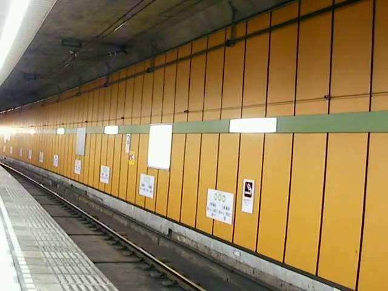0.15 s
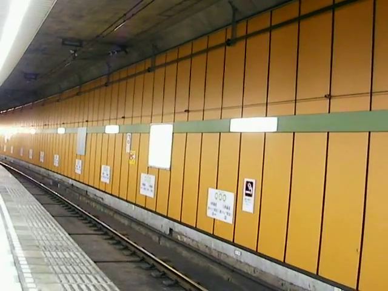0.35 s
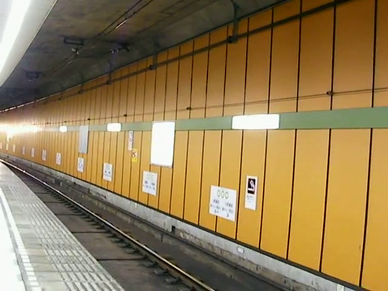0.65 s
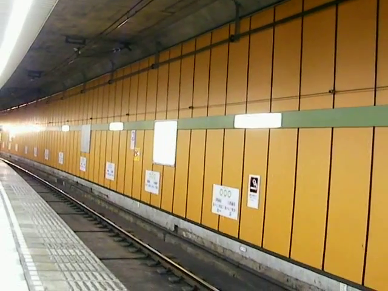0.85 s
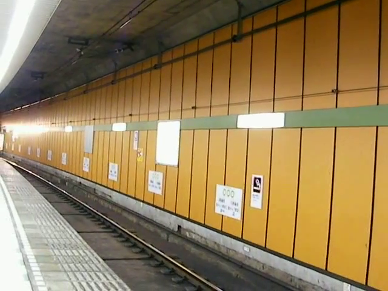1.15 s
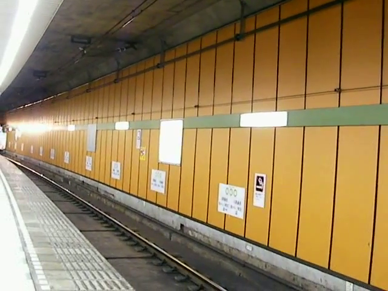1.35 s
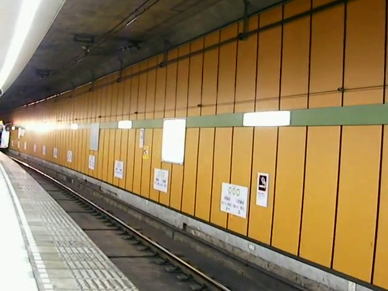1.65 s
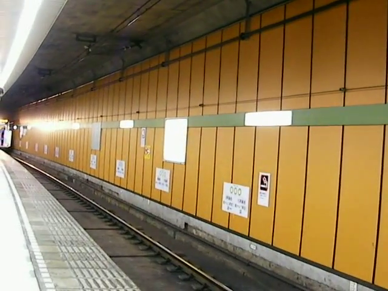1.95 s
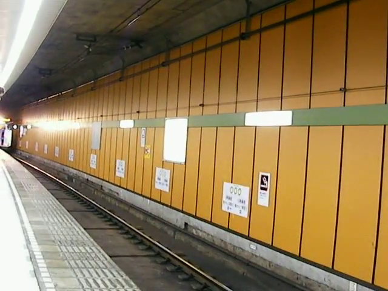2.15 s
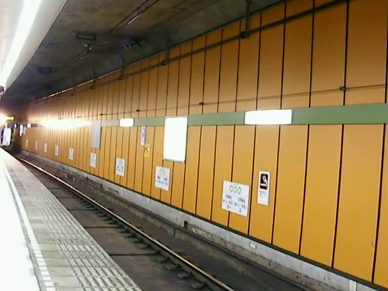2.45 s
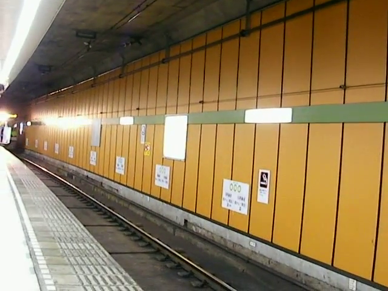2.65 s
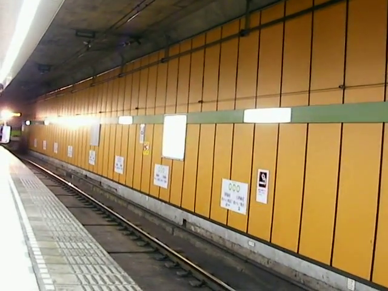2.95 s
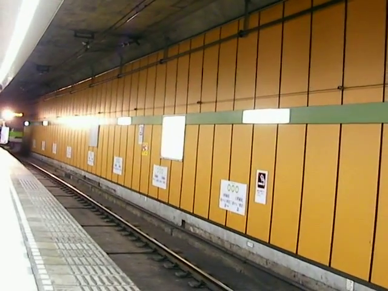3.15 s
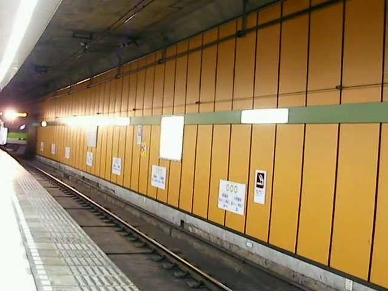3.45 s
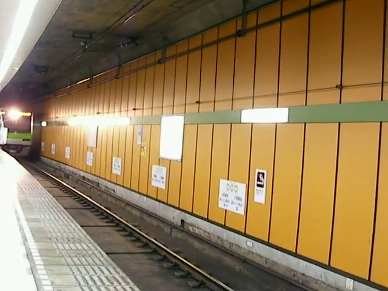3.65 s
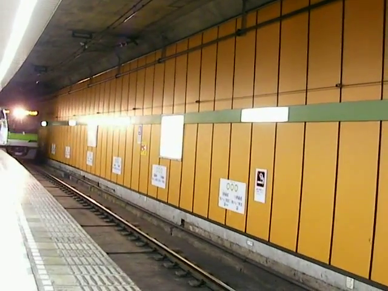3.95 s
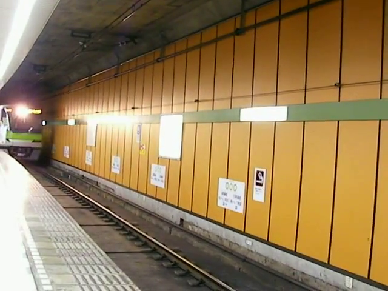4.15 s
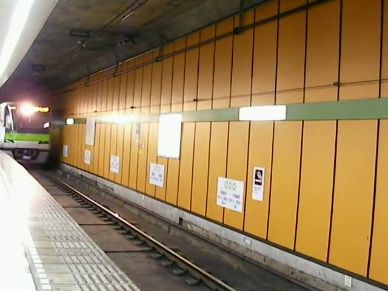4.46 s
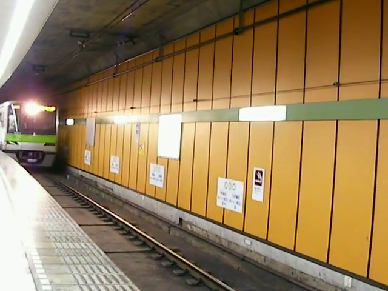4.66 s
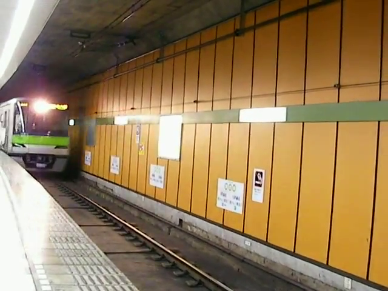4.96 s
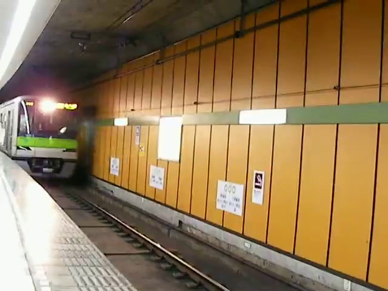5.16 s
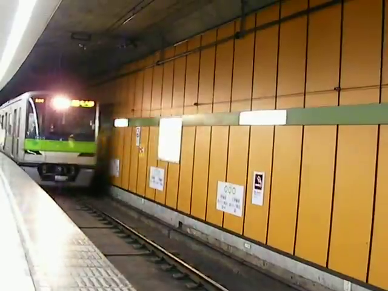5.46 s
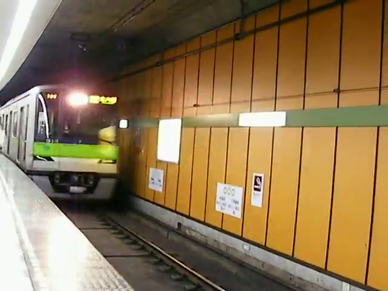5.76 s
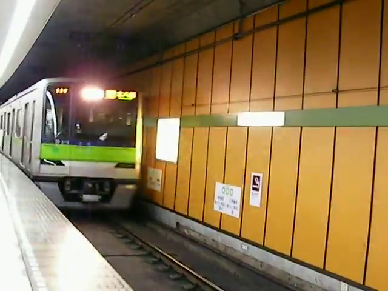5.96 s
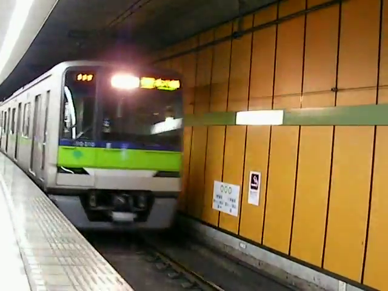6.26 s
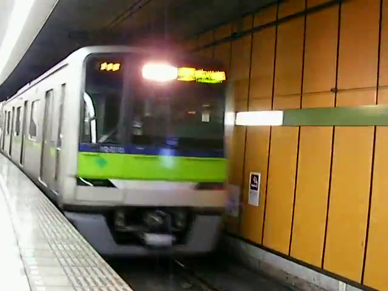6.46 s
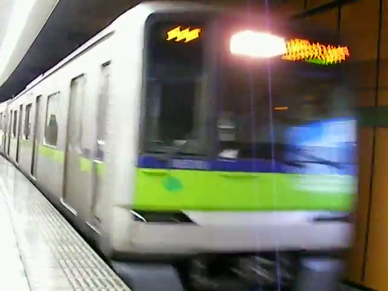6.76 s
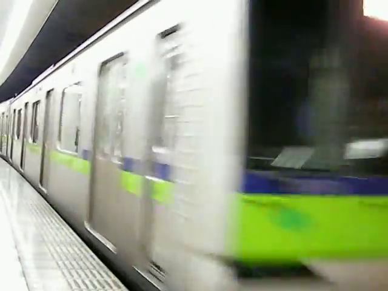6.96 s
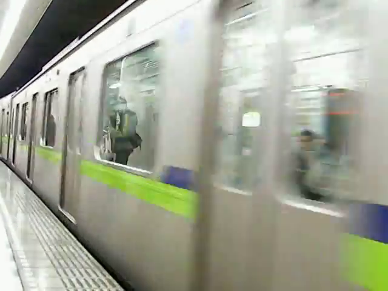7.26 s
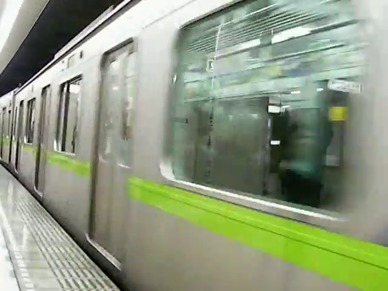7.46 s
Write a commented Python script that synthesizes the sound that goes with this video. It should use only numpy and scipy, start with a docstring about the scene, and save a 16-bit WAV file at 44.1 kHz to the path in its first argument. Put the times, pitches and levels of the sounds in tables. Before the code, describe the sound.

Roaring, booming rumble of an approaching subway train, with irregular wheel clacks, thin metallic ringing and a growing steel hiss.

```python
"""A subway train runs out of its tunnel along a tiled platform, heard by two closely spaced microphones.
From the start the track rumbles and roars, flanges grind, narrow tones swell and fade, sliding steel
hisses and surges at each slip, and the tunnel booms and throbs. The rails ping; from 0.6 s wheels knock
over joints and roar over rough patches. From 1.5 s they ring in the curve. After 5 s the hiss grows as
the nearest wheels sweep from left to right, and the cab passes at about 7 s."""
import sys
import numpy as np
from scipy import signal
from scipy.fft import rfft, irfft, next_fast_len
from scipy.io import wavfile
from scipy.ndimage import uniform_filter1d, map_coordinates

SR = 44100
rng = np.random.default_rng(int(sys.argv[2]) if len(sys.argv) > 2 else 0)


def dump(signal):
    """Clip the signal to [-1, 1] and save it as 16-bit WAV at the path in sys.argv[1]."""
    limited = np.clip(np.atleast_2d(signal).T, -1, 1)
    pcm = np.round(limited * 32767).astype(np.int16)
    wavfile.write(sys.argv[1], SR, pcm)


N = 335821
TIME = np.arange(N) / SR
FFT_SIZE = next_fast_len(N)
HZ = np.maximum(np.arange(FFT_SIZE // 2 + 1) * SR / FFT_SIZE, 1)


def from_db(db):
    """Decibels to gain."""
    return 10 ** (np.asarray(db) / 20)


def in_time(rows):
    """Each column of a time curve at every sample."""
    t_s, *columns = np.transpose(rows)
    return [np.interp(TIME, t_s, column) for column in columns]


def over_hz(points):
    """Table interpolated over log frequency."""
    hz, value = np.transpose(points)
    return np.interp(np.log(HZ), np.log(hz), value)


def resonances(modes):
    """Gain over frequency of independently driven, steep-sided resonances."""
    gains = (from_db(db) / (1 + 2 * ((HZ - hz) / width_hz) ** 2) for hz, width_hz, db in modes)
    return np.sqrt(sum(gain ** 2 for gain in gains))


def mono_noise(colour):
    """Coloured noise, rms 1."""
    noise = irfft(rfft(rng.standard_normal(FFT_SIZE)) * colour, FFT_SIZE)[:N]
    return noise / np.sqrt(np.mean(noise ** 2) + 1e-20)


def drift(rate_hz):
    """Random wander, rms 1, mostly below rate_hz."""
    return mono_noise(1 / (1 + (HZ / rate_hz) ** 2))


def steady(pair, span_s):
    """Even out swells slower than span_s."""
    power = uniform_filter1d(pair.mean(axis=0) ** 2, int(span_s * SR))
    return pair / np.sqrt(power + 1e-9)


def swell(start_s, hold_s, attack_s, release_s):
    """Gain: linear rise, hold, exponential decay."""
    age_s = TIME - start_s
    fall = np.clip((age_s - attack_s - hold_s) / release_s, 0, 20)
    return np.clip(age_s / attack_s, 0, 1) * np.exp(-fall)


def with_bursts(base_db, bursts, attack_s, release_s):
    """Gain of a base level plus bursts (t/s, hold/s, level/dB), summed in power."""
    power = sum((from_db(db) * swell(t_s, hold_s, attack_s, release_s)) ** 2
                for t_s, hold_s, db in bursts)
    return np.sqrt(from_db(base_db) ** 2 + power)


def pan(left_minus_right_db):
    """Left and right gains."""
    return from_db(left_minus_right_db * np.array([[.5], [-.5]]))


# Likeness of the microphones: f/Hz, coherence (-1 opposed, 1 alike)
MIC_COHERENCE = [(30, .25), (70, .78), (150, .78), (250, .89), (480, .8), (1100, .76), (1700, .75),
                 (2600, .6), (4000, .36), (5000, .25), (6200, -.25), (7800, -.5), (9000, -.25),
                 (10000, -.38), (11200, .05), (13500, .2)]
# Balance: f/Hz, left minus right/dB
MIC_BALANCE = [(35, -1), (75, -3), (125, -2), (200, -4), (260, -3), (310, -6), (360, -2.5), (430, -4),
               (1000, -5), (1880, -2), (2700, 0), (3500, 4), (5040, 2.5), (7000, 0.5), (10000, -1.5),
               (13500, 0.5)]
# Lead of the left microphone: f/Hz, phase/rad
MIC_PHASE = [(60, -.6), (110, -.25), (300, -.1), (600, .1), (1000, .35), (2000, .75), (2800, .95),
             (4000, .3), (5000, .6), (6200, -.5), (9000, -.3), (10500, -.3), (11500, 1.0), (13500, .8)]
def air_noise(colour, coherence=None):
    """Coloured noise from the tunnel mouth at both microphones; their mean has rms 1."""
    alike = over_hz(MIC_COHERENCE) if coherence is None else coherence
    mid, side = rng.standard_normal((2, len(HZ))) + 1j * rng.standard_normal((2, len(HZ)))
    mid, side = np.sqrt(1 + alike) * mid, np.sqrt(1 - alike) * side
    left = (mid + side) * np.exp(1j * over_hz(MIC_PHASE))
    spectra = np.array([left, mid - side]) * pan(over_hz(MIC_BALANCE))
    pair = irfft(colour * spectra, FFT_SIZE)[:, :N]
    return pair / np.std(pair.mean(axis=0))


# Track bed spectrum: f/Hz, level/dB
BED_SPECTRUM = [(15, -47), (30, -38), (40, -35), (52, -3.5), (75, 6), (120, 4), (160, -0.5), (260, 2),
                (400, -50)]
def bed_rumble(level_db=-39.5, sway_db=1.0):
    """The track bed rumbles under a train rolling at even speed."""
    rumble = steady(air_noise(from_db(over_hz(BED_SPECTRUM))), span_s=0.25)
    return rumble * from_db(level_db + sway_db * drift(rate_hz=10))


# Roar spectrum: f/Hz, level/dB
ROAR_SPECTRUM = [(200, -39), (340, -10.5), (420, -5), (520, -4.5), (660, 0), (850, -0.5), (1050, -1),
                 (1300, -9.5), (1700, -20), (2500, -21.5), (5000, -67)]
# Track and wheel modes: f/Hz, width/Hz, level/dB re roar
TRACK_RESONANCES = [(396, 16, 0.5), (438.5, 45, 3), (543, 21, 1), (619.3, 19, -5), (750, 95, -2.5),
                    (873, 53, -2), (996, 46.3, -6.5), (1215, 26, 2.5), (1504, 256, 7.5)]
# Sleeper roar: t/s, level/dB
SLEEPER_LEVEL = [(0, -25.5), (1.2, -27.5), (1.8, -26), (2.1, -25.5), (2.65, -25), (2.8, -25.5),
                 (3.25, -26.5), (3.4, -24), (3.95, -29), (4.06, -26), (5.85, -26), (6.12, -26.5),
                 (6.5, -26), (7.6, -26.5)]
def track_roar(bumps, rails_db=-27, rough_db=1.0, crossover_hz=719):
    """Rough treads shake the sleepers low and the rails higher."""
    sleepers_db, = in_time(SLEEPER_LEVEL)
    colour = from_db(over_hz(ROAR_SPECTRUM)) * np.sqrt(1 + resonances(TRACK_RESONANCES) ** 2)
    low_share = 1 / (1 + (HZ / crossover_hz) ** 10)
    sleepers = steady(air_noise(colour * np.sqrt(low_share)), span_s=0.13)
    rails = steady(air_noise(colour * np.sqrt(1 - low_share)), span_s=0.092)
    return sleepers * from_db(sleepers_db) + rails * from_db(rails_db + rough_db * bumps)


# Grind spectrum: f/Hz, level/dB
GRIND_SPECTRUM = [(700, -45), (1200, 5), (1550, 7), (2000, 5), (2500, -4), (3300, -1.5), (6000, -34.5)]
# Flange bites: t/s, hold/s, level/dB
FLANGE_BITES = [(0.0, 0.14, -34.5), (0.537, 0.11, -37.5), (0.86, 0.046, -33.5), (1.902, 0.072, -33),
                (2.314, 0.22, -38.5), (4.068, .07, -32.5), (4.17, 0.17, -36), (4.47, .12, -38),
                (6.008, 0.07, -32.5), (6.16, .05, -33.5), (7.092, 0.04, -32), (7.304, 0.11, -34),
                (7.52, .09, -39)]
def flange_grind(bumps, base_db=-38.5, rough_db=1.7):
    """Flanges grind unevenly in the curve; now and then one bites the rail."""
    gain = with_bursts(base_db, FLANGE_BITES, attack_s=0.025, release_s=0.074)
    return air_noise(from_db(over_hz(GRIND_SPECTRUM))) * gain * from_db(rough_db * bumps)


# Narrow tones: t/s, half length/s, f/Hz, width/Hz, level/dB
RINGING_TONES = [(.06, .12, 5000, 380, -43.5), (.06, .11, 5950, 200, -51), (.66, .1, 4900, 400, -47),
                 (.68, .035, 1120, 110, -31), (1.1, 1.1, 1510, 100, -41), (3.55, .15, 5130, 100, -53),
                 (3.7, 1.1, 1220, 40, -38), (3.82, .1, 1000, 110, -32.5), (4.12, .08, 1722, 80, -35.5),
                 (6.06, .045, 1920, 200, -37), (6.72, .17, 2560, 220, -43), (6.76, .17, 4020, 220, -42),
                 (7.54, .13, 4000, 170, -44), (7.53, .14, 5250, 170, -48), (7.56, .18, 1700, 150, -36.5)]
def ringing_tones():
    """Narrow tones swell and fade: short squeals and two long, lower resonances."""
    tones = np.zeros((2, N))
    for t_s, half_s, hz, width_hz, db in RINGING_TONES:
        gain = from_db(db) * np.exp(-((TIME - t_s) / half_s) ** 2)
        tones += gain * air_noise(resonances([(hz, width_hz, 0)]), coherence=0.48)
    return tones


# Direct hiss before surges: t/s, level/dB
CLOSE_LEVEL = [(0, -68), (5.2, -53), (5.7, -50), (6.05, -42), (6.4, -45), (6.6, -41), (6.9, -44),
               (7.05, -38), (7.35, -36.5), (7.61, -38)]
# Its spectrum: f/Hz, level/dB
CLOSE_SPECTRUM = [(2200, -22), (3300, -5), (4100, -6), (5300, 1), (6200, 5), (7200, -2), (9000, -13),
                  (13500, -22)]
# Its direction: t/s, angle to the right/deg
CLOSE_BEARING = [(0, -48), (4, -40), (5.4, 0), (6.0, 35), (6.7, 58), (7.6, 72)]
def close_wheels(mic_crossing_s=7.2e-5):
    """Direct hiss of the nearest wheels, swept left to right by the delay between microphones."""
    close_db, = in_time(CLOSE_LEVEL)
    bearing_deg, = in_time(CLOSE_BEARING)
    lag_s = mic_crossing_s * np.sin(np.radians(bearing_deg))
    right = mono_noise(from_db(over_hz(CLOSE_SPECTRUM)))
    left = map_coordinates(right, [(TIME - lag_s) * SR], order=3, mode="nearest")
    return from_db(close_db) * np.array([left, right])


SLIP_ATTACK_S, SLIP_RELEASE_S = 0.016, 0.03
# Reflected hiss before surges: t/s, level/dB
HISS_LEVEL = [(0.0, -35.5), (0.3, -42), (3.3, -39), (5.11, -38), (6.06, -33.5), (6.4, -35), (6.56, -34.5),
              (6.78, -37), (7.04, -34.5), (7.61, -36.5)]
# Its spectrum: f/Hz, level/dB
HISS_SPECTRUM = [(1200, -15.5), (2100, 3.5), (2800, 1), (3300, 1), (4000, 0), (4500, -3.5), (5300, -3.5),
                 (6100, -8), (7000, -11.5), (8800, -15), (10000, -15), (11200, -21.5), (12400, -18.5),
                 (13600, -43)]
# Wheel slips: t/s, hold/s, level/dB
WHEEL_SLIPS = [(0.0, 0.13, -42), (0.545, 0.034, -39.5), (0.62, 0.095, -42.5), (3.47, 0.2, -42.5),
               (3.845, 0.041, -42.5), (4.29, 0.089, -41.5), (5.663, 0.094, -37), (6.008, 0.032, -36),
               (6.161, 0.07, -36), (6.58, 0.14, -37.5), (6.72, .11, -34.5), (6.872, 0.057, -36.5),
               (7.083, 0.042, -37.5), (7.292, 0.044, -38), (7.472, 0.058, -38)]
def sliding_hiss(flutter_db=1.1, grit_db=0.72, edge_hz=7000, lull_s=3.805, lull_half_s=0.03, lull_db=-6):
    """Steel slides on steel, heard off the walls and direct; slips make it louder and sharper."""
    base_db, = in_time(HISS_LEVEL)
    surge_db = 20 * np.log10(with_bursts(base_db, WHEEL_SLIPS, SLIP_ATTACK_S, SLIP_RELEASE_S)) - base_db
    surge_db += lull_db * np.exp(-((TIME - lull_s) / lull_half_s) ** 2)
    hiss = from_db(base_db) * air_noise(from_db(over_hz(HISS_SPECTRUM))) + close_wheels()
    edge = signal.lfilter(*signal.butter(1, edge_hz, "high", fs=SR), hiss)
    hiss += edge * (from_db(surge_db) - 1)  # harder sliding brings out the top
    return hiss * from_db(surge_db + flutter_db * drift(rate_hz=15) + grit_db * drift(rate_hz=130))


# High hiss: t/s, level/dB
HIGH_LEVEL = [(0, -49), (0.3, -54.5), (2.5, -56.5), (3.6, -63), (3.9, -75), (5.3, -62), (6.5, -54),
              (7.6, -51)]
# Its spectrum: f/Hz, level/dB
HIGH_SPECTRUM = [(5000, -29), (8500, 2), (10000, -2), (11300, -0.5), (13600, -2)]
# Its whine: f/Hz, width/Hz, level/dB re hiss
HIGH_WHINE = [(12375, 120, 3)]
# Its spits: t/s, hold/s, level/dB
HIGH_SPITS = [(.02, .06, -48), (6.884, .03, -52), (7.11, .03, -55), (7.476, 0.062, -46)]
def high_hiss():
    """A faint high hiss with a thin whine; it spits as the cars rush by."""
    base_db, = in_time(HIGH_LEVEL)
    colour = from_db(over_hz(HIGH_SPECTRUM)) * np.sqrt(1 + resonances(HIGH_WHINE) ** 2)
    return with_bursts(base_db, HIGH_SPITS, SLIP_ATTACK_S, SLIP_RELEASE_S) * air_noise(colour)


THROB_ATTACK_S, THROB_RELEASE_S = 0.013, 0.012
# Air column boom: t/s, level/dB before trim
BOOM_LEVEL = [(0.0, -26), (0.38, -25), (0.63, -25), (1.74, -26.5), (2.2, -28.5), (2.86, -24), (3.25, -27),
              (3.7, -28), (4.4, -28), (4.65, -27), (4.95, -25.5), (5.35, -27), (5.93, -25.5), (6.65, -27),
              (6.95, -31.5), (7.1, -27), (7.61, -27)]
# Tunnel modes: f/Hz, width/Hz, relative level/dB
TUNNEL_RESONANCES = [(195.7, 35, -3.5), (238, 20, -1.5), (273, 48, 0), (311.6, 25, -6.5)]
# Throbs of the low boom: t/s, hold/s, hum f/Hz, hum level/dB
BOOM_THROBS = [(0.067, 0.024, 248.3, -20.5), (0.136, 0.072, 247.8, -22), (0.188, 0.12, 274.7, -26),
               (0.31, 0.068, 192, -25), (0.444, 0.097, 233, -26.5), (1.766, 0.047, 243, -26),
               (1.95, 0.046, 250, -27), (2.288, 0.045, 290, -25), (2.38, 0.08, 234, -27.5),
               (2.67, 0.061, 241.4, -25.5), (2.83, 0.18, 289.3, -31), (3.097, 0.046, 249, -25),
               (3.23, 0.31, 277.7, -31.5), (3.345, 0.056, 251.5, -27), (3.584, 0.2, 276.2, -28),
               (3.834, 0.044, 262.4, -21.5), (4.096, 0.037, 190.5, -27.5), (4.311, 0.25, 256.4, -29),
               (4.96, 0.072, 235, -23), (5.168, .14, 256, -31), (5.968, 0.033, 262, -25.5),
               (6.144, 0.056, 197, -30), (6.302, 0.034, 251, -26), (7.03, 0.13, 272.2, -29),
               (7.388, 0.045, 283, -25)]
def tunnel_boom(trim_db=0.9, sway_db=1.0, throb_re_hum_db=-3.5):
    """The tunnel's air booms in a few low modes and throbs."""
    boom_db, = in_time(BOOM_LEVEL)
    base_db = boom_db + trim_db + sway_db * drift(rate_hz=13)
    throbs = [(t_s, hold_s, db + throb_re_hum_db) for t_s, hold_s, _, db in BOOM_THROBS]
    gain = with_bursts(base_db, throbs, THROB_ATTACK_S, THROB_RELEASE_S)
    return gain * steady(air_noise(resonances(TUNNEL_RESONANCES)), span_s=0.088)


def tunnel_hum(waver_hz=4.5):
    """Each throb is a brief hum at one wavering pitch, louder on the right."""
    waver_turns = waver_hz * np.cumsum(drift(rate_hz=14.34)) / SR
    hum = np.zeros(N)
    for t_s, hold_s, hz, db in BOOM_THROBS:
        gain = from_db(db) * swell(t_s, hold_s, THROB_ATTACK_S, THROB_RELEASE_S)
        hum += gain * np.sin(2 * np.pi * (hz * TIME + waver_turns + rng.random()))
    return np.sqrt(2) * hum * pan(left_minus_right_db=-1.5)


def rail_pings(per_s=14, low_hz=600, high_hz=1100, rise_s=0.032,
               top_db=-32, range_db=5, fall_db_per_octave=3.5):
    """Tread bumps set off short rings at random, each near a track mode between low_hz and high_hz."""
    pings = np.zeros((2, N + SR))
    age_s = np.arange(SR // 2) / SR
    envelope = np.sqrt(2) * age_s / rise_s * np.exp(1 - age_s / rise_s)
    modes = [(hz, width_hz) for hz, width_hz, _ in TRACK_RESONANCES if low_hz < hz < high_hz]
    for when, pick, detune, weakness, phase, spread in rng.random((int(per_s * N / SR), 6)):
        centre_hz, width_hz = modes[int(pick * len(modes))]
        hz = centre_hz + width_hz * (detune - .5)
        db = top_db - range_db * weakness - fall_db_per_octave * np.log2(hz / low_hz)
        mic_turns = phase + np.array([[0], [spread - .5]]) / 4
        tone = np.sin(2 * np.pi * (hz * age_s + mic_turns))
        start = int(when * N)
        pings[:, start:start + len(age_s)] += from_db(db) * envelope * tone
    return pings[:, :N] * pan(left_minus_right_db=2.5)


# Joint knocks: t/s, level/dB before trim, relative brightness/dB
RAIL_JOINTS = [(0.572, -24, 8), (0.668, -11.5, -6), (1.588, -10.5, -6), (1.607, -15, -10),
               (1.735, -15.5, -16), (1.778, -13, -16), (1.797, -20, -16), (1.822, -20, -16),
               (2.05, -20, -14), (3.759, -12.5, -13), (3.987, -12, -11), (4.1, -14, -1),
               (4.482, -14.5, -14), (4.889, -15, -12), (5.819, -19, 6), (6.037, -17, 12), (6.527, -16, 5),
               (6.953, -25, -9), (7.13, -22, 2), (7.528, -25, -3)]
# Knock spectrum: f/Hz, level/dB
KNOCK_SPECTRUM = [(100, -29), (250, -9.5), (450, -23), (1000, 1.5), (1400, -8), (2500, -15), (5000, -22),
                  (12000, -57)]
def joint_knocks(rise_s=0.0021, knock_t60_s=0.11, station_t60_s=1.24, echo_db=-14,
                 trim_db=-7.5, treble_db=-18, crossover_hz=1500):
    """A wheel drops into a joint with a short knock that the station draws out."""
    dull_power, bright_power = np.zeros((2, N))
    for t_s, db, bright_db in RAIL_JOINTS:
        age_s = np.maximum(TIME - t_s + rise_s, 0)
        decay = from_db(-60 * age_s / knock_t60_s) + from_db(echo_db - 60 * age_s / station_t60_s)
        gain = from_db(db + trim_db) * np.minimum(age_s / rise_s, 1) * decay
        dull_power += gain ** 2
        bright_power += (gain * from_db(bright_db + treble_db)) ** 2
    colour = from_db(over_hz(KNOCK_SPECTRUM))
    treble_share = HZ ** 2 / (HZ ** 2 + crossover_hz ** 2)
    dull = np.sqrt(dull_power) * air_noise(colour * (1 - treble_share))
    return dull + np.sqrt(bright_power) * air_noise(colour * treble_share)


# Rough patches: t/s, hold/s, f/Hz, level/dB
ROUGH_PATCHES = [(0.59, 0.074, 720, -32), (0.883, 0.06, 840, -25.5), (3.242, .1, 720, -33),
                 (3.39, .04, 696, -29), (3.78, 0.18, 780, -27.5), (4.52, 0.061, 870, -32),
                 (4.72, .17, 745, -28), (5.407, .05, 734, -31), (5.848, 0.048, 790, -27),
                 (6.245, .08, 710, -33), (6.52, 0.04, 860, -28), (6.877, .07, 820, -27.5)]
def rail_surges(width_hz=100):
    """A rough patch drives one rail resonance for a moment."""
    surges = np.zeros((2, N))
    for t_s, hold_s, hz, db in ROUGH_PATCHES:
        roar = steady(air_noise(resonances([(hz, width_hz, 0)])), span_s=0.05)
        surges += from_db(db) * swell(t_s, hold_s, attack_s=0.016, release_s=0.02) * roar
    return surges


# Wheel ring in the curve: t/s, f/Hz, level/dB before trim
RING_CURVE = [(1.4, 2380, -62), (1.6, 2385, -47), (1.95, 2410, -46), (2.1, 2400, -55), (2.55, 2395, -45.5),
              (3.4, 2410, -44), (3.7, 2380, -43.5), (3.95, 2400, -50), (4.25, 2405, -42.5),
              (4.5, 2400, -47), (4.9, 2375, -43.5), (5.4, 2385, -47), (5.75, 2435, -43), (6.05, 2380, -44),
              (6.35, 2400, -45.5), (6.65, 2450, -43.5), (7.0, 2430, -44), (7.6, 2410, -52)]
def wheel_ring(width_hz=54, wander_hz=9, flicker_db=3.0, trim_db=-1.5):
    """Many wheels ring, flickering, around one wandering pitch."""
    ring_hz, ring_db = in_time(RING_CURVE)
    centre_hz = ring_hz.max()
    band = steady(air_noise(resonances([(centre_hz, width_hz, 0)])), span_s=0.18)
    # read speed bends the pitch
    position = np.cumsum((ring_hz + wander_hz * drift(rate_hz=6.18)) / centre_hz)
    ring = np.array([map_coordinates(side, [position], order=3, mode="mirror") for side in band])
    return ring * from_db(ring_db + trim_db + flicker_db * drift(rate_hz=12))


def scene():
    """The whole train from the platform edge."""
    bumps = drift(rate_hz=15)  # roughness shared by rails and flanges
    rolling = bed_rumble() + track_roar(bumps) + flange_grind(bumps) + ringing_tones()
    hiss = sliding_hiss() + high_hiss()
    tunnel = tunnel_boom() + tunnel_hum()
    return rolling + hiss + tunnel + rail_pings() + joint_knocks() + rail_surges() + wheel_ring()


def record(dry):
    """A deep treble notch and a steep top cut."""
    notch_hz, notch_width_hz, cutoff_hz = 7900, 1800, 13450
    b, a = signal.iirnotch(notch_hz, notch_hz / notch_width_hz, fs=SR)
    notched = signal.lfilter(b, a, signal.lfilter(b, a, dry))
    return signal.sosfilt(signal.ellip(12, .1, 90, cutoff_hz, fs=SR, output="sos"), notched)


dry = scene()
out = record(dry)
dump(out)
```